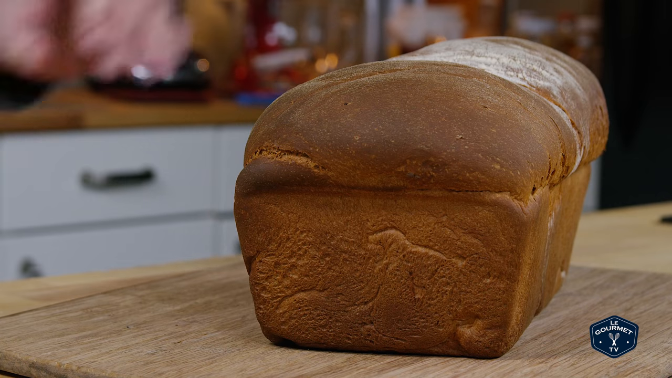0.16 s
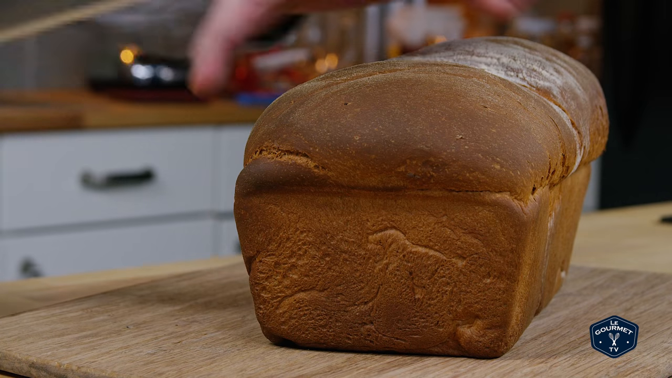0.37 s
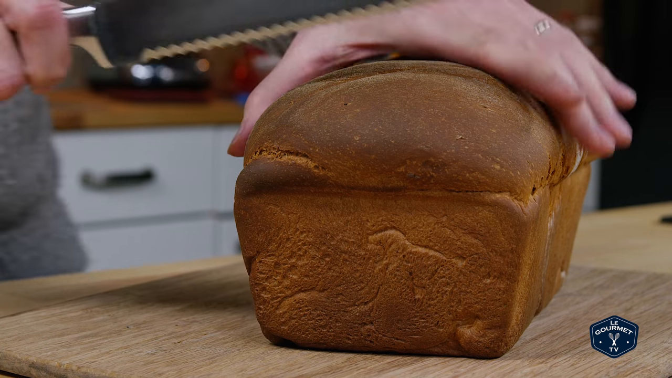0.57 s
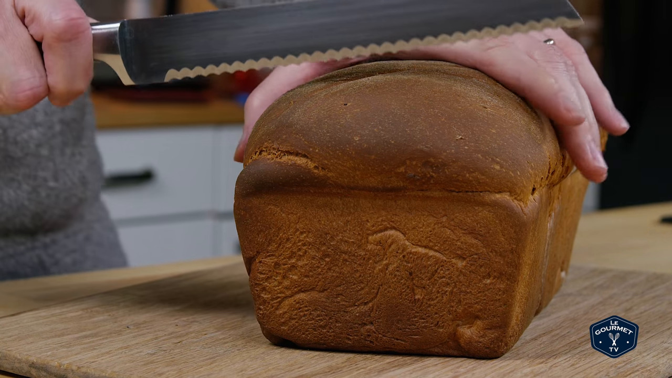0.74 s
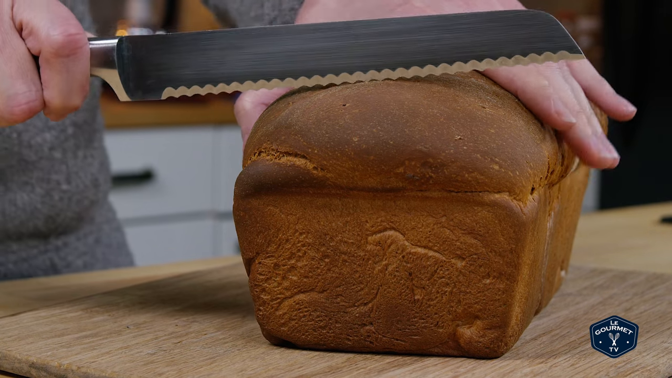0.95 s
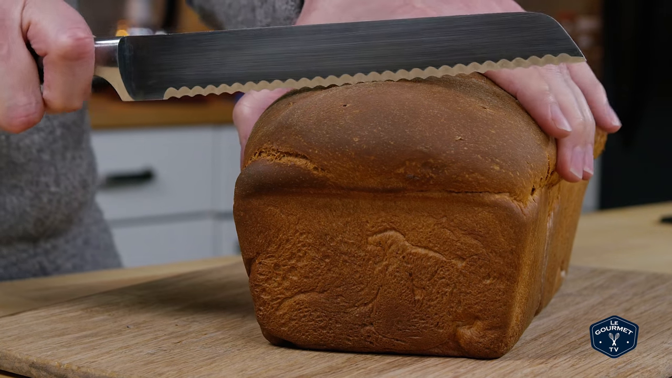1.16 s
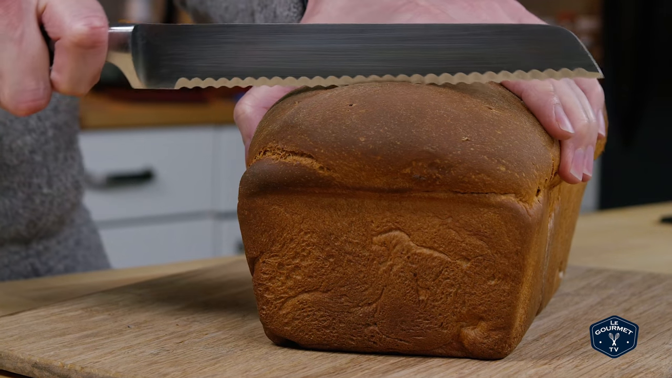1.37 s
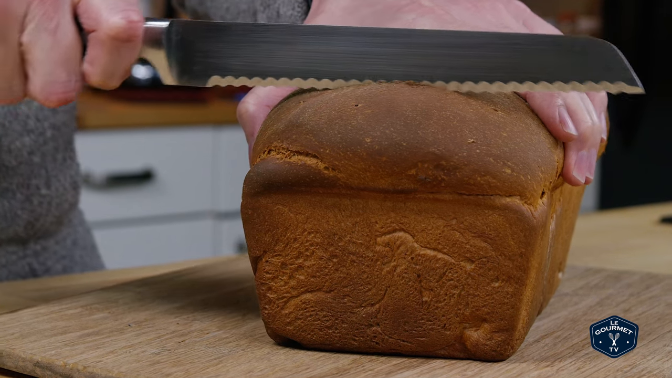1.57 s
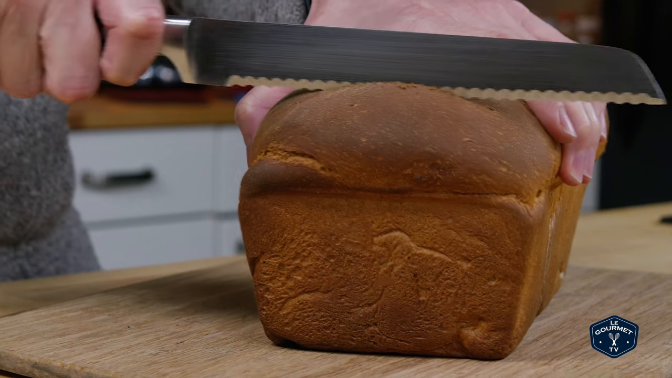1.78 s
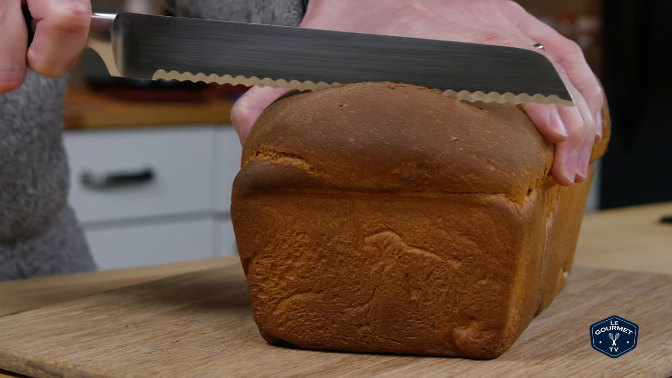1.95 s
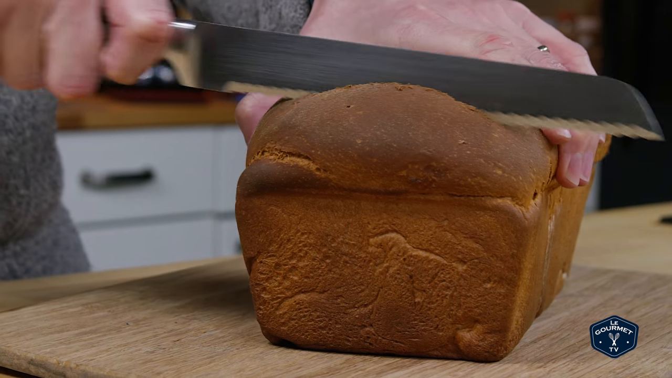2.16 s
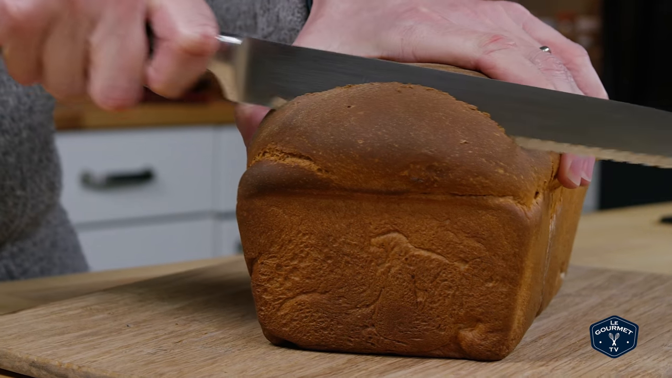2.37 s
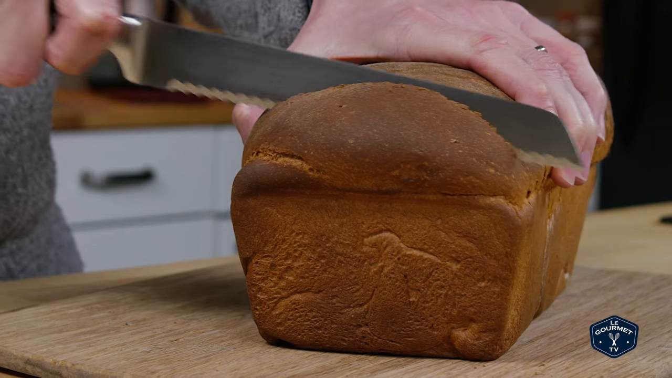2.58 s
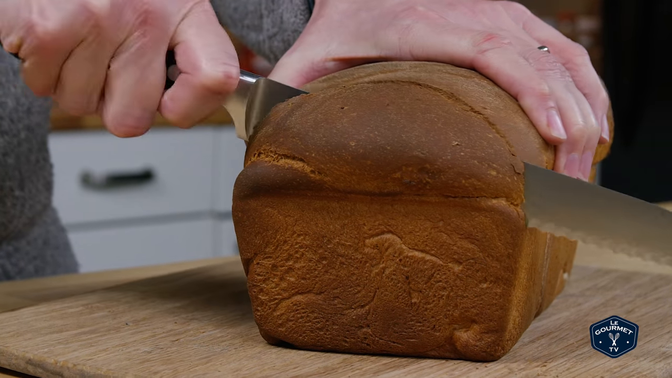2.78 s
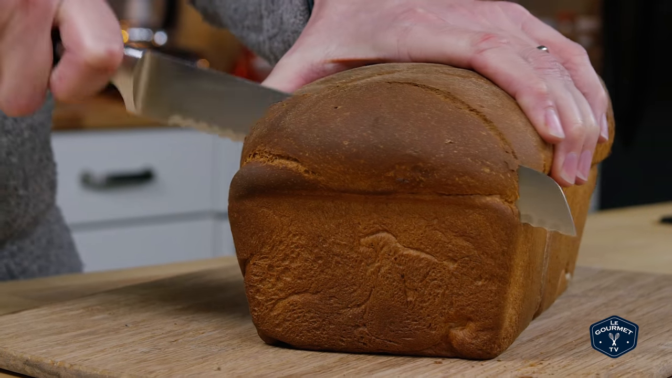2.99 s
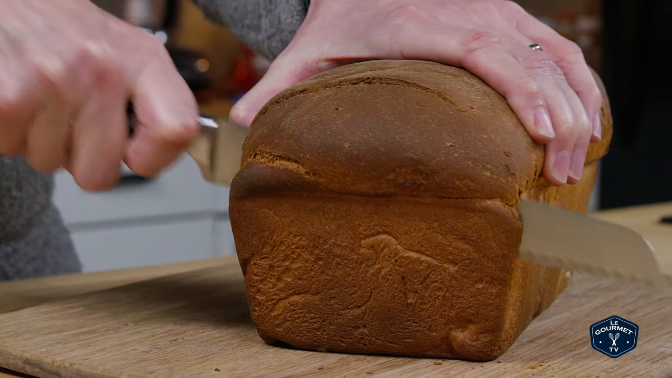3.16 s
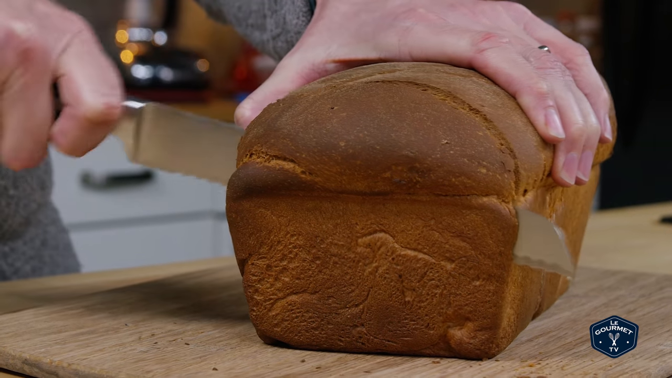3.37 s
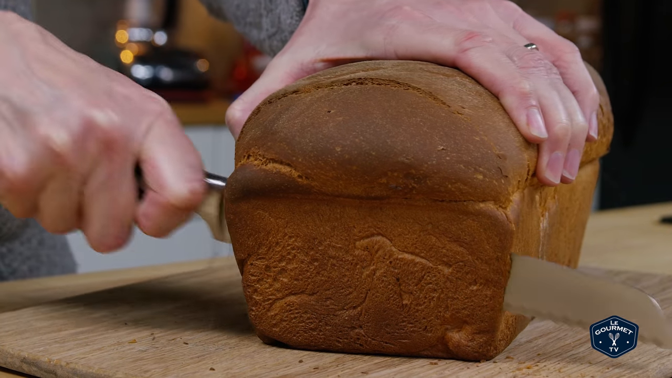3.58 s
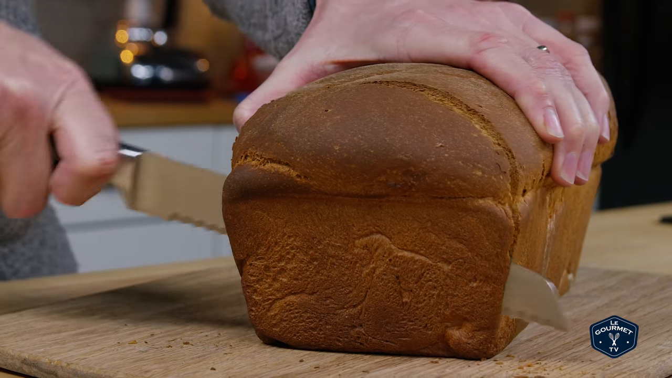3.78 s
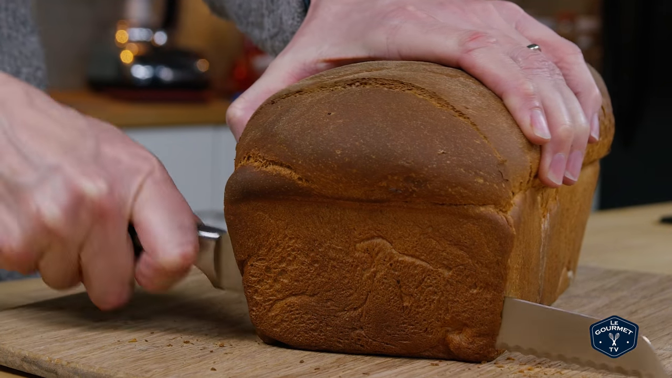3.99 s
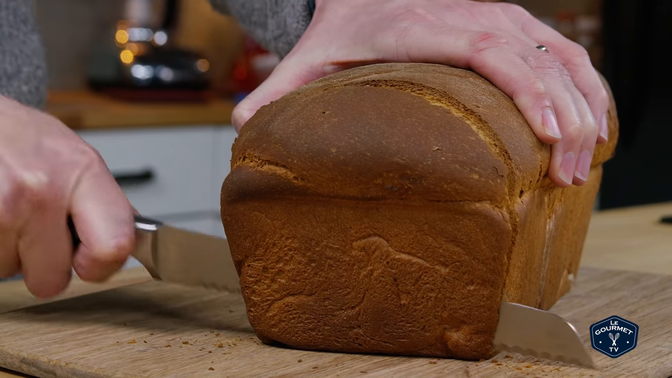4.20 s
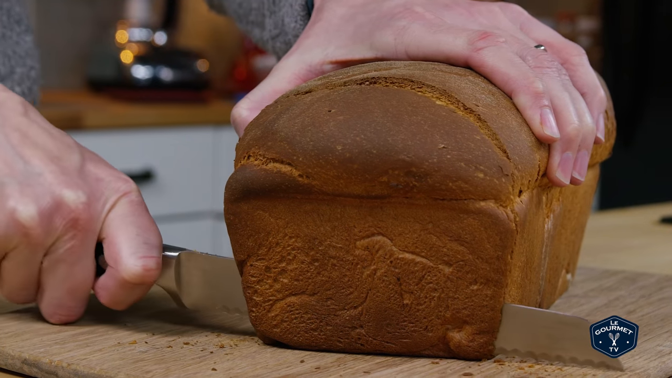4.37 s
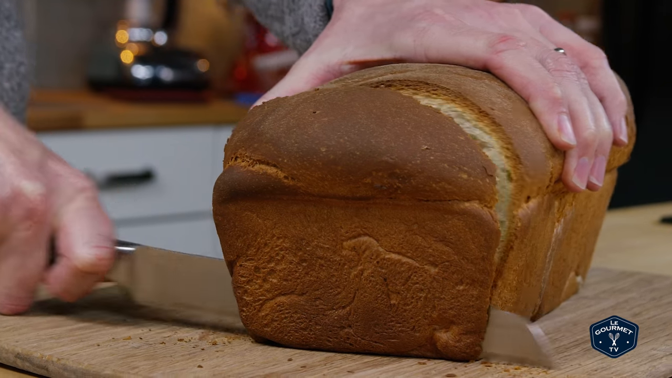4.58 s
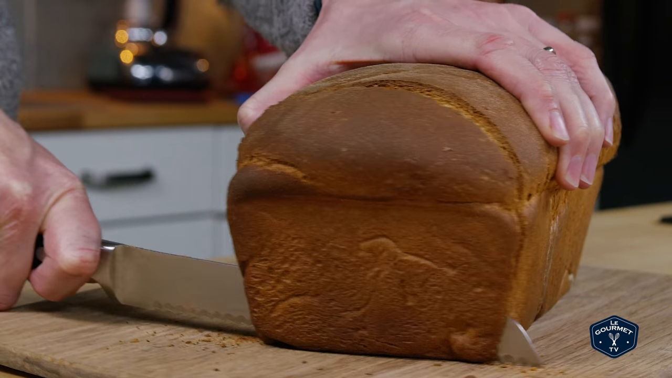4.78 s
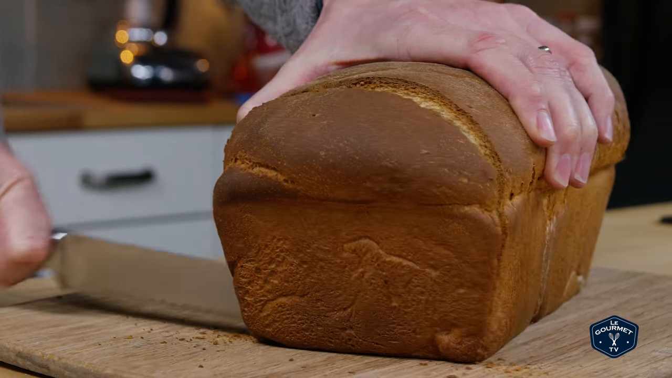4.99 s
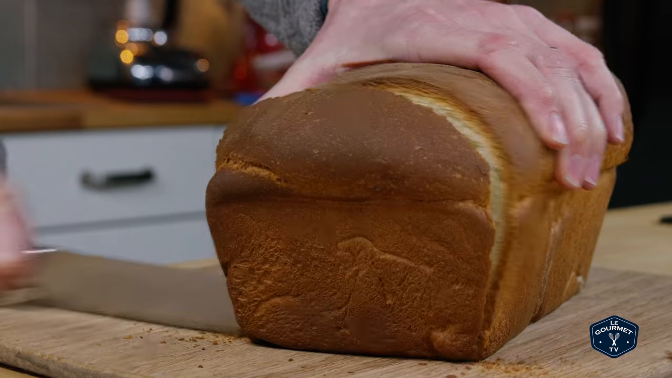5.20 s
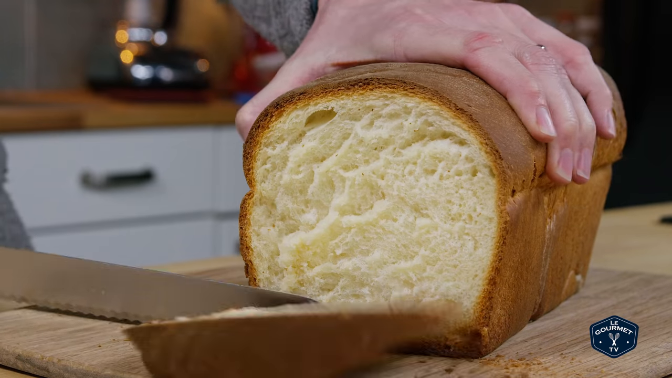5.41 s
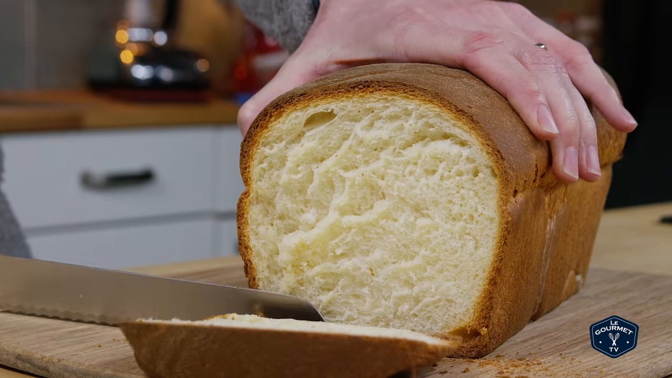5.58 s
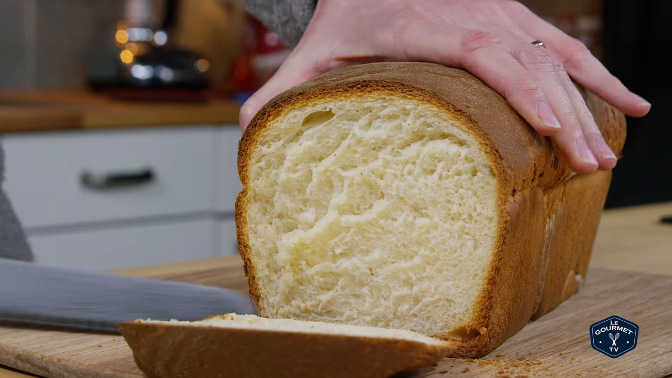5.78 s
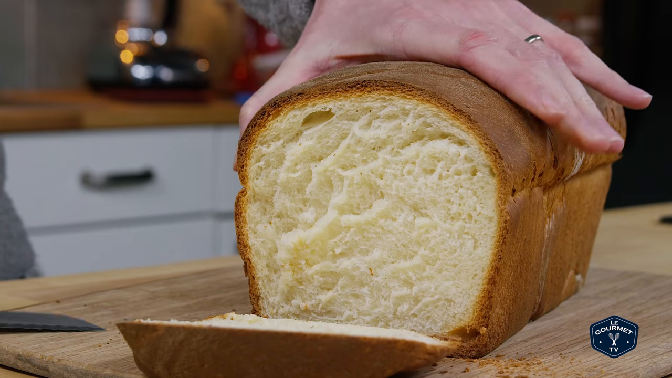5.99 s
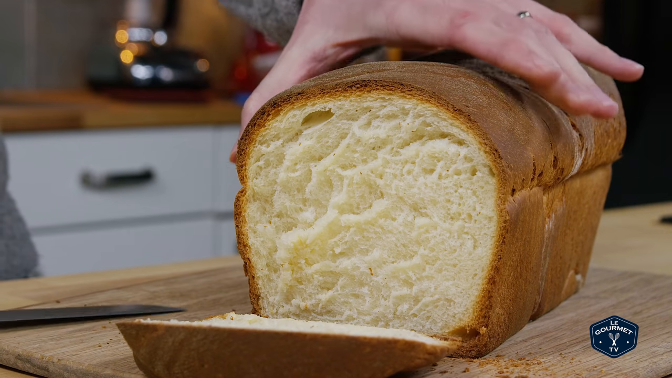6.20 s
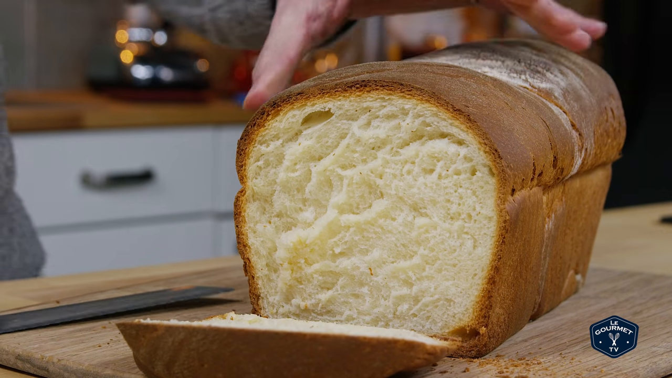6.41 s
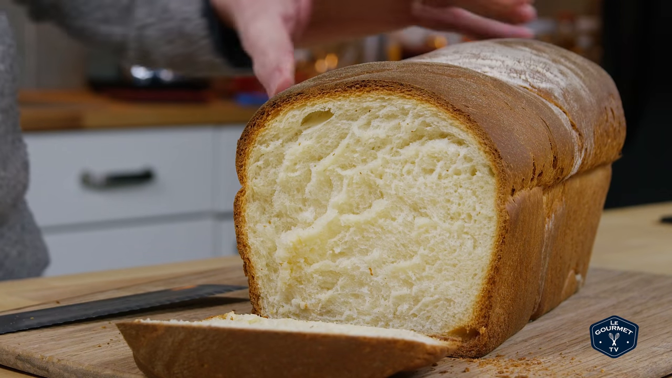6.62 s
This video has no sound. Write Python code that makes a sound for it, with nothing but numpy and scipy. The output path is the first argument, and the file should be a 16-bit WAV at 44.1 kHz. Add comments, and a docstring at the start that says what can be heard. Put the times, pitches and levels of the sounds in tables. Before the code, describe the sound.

Close microphone in a small quiet kitchen. A hand grazes dry crust, then a serrated knife saws a loaf on a wooden board, slow crackling first strokes becoming quicker and fuller, with low board shudder. A strong tearing stroke frees the slice, which falls with clattering woody thumps. The blade drags away with a thin metallic ring and is set down with a sharp knock.

```python
"""A small quiet kitchen, heard close up: a serrated knife saws a crusty loaf on a wooden board.
A hand slides onto the crust, teeth tear it stroke by stroke and shake loaf and board, the slice drops,
the steel blade is dragged off ringing faintly and is laid down with a knock.
Tearing and sliding are shaped noise under movement envelopes; blows excite decaying modes.
A short room tail, air noise and faint appliance tones lie behind."""
import sys
import numpy as np
from scipy import signal
from scipy.fft import rfft, irfft
from scipy.io import wavfile
from scipy.ndimage import uniform_filter1d

SR = 44100
rng = np.random.default_rng(int(sys.argv[2]) if len(sys.argv) > 2 else 0)


def wav_out(sig):
    """Save sig, one row per channel (or a flat mono array), as 16-bit PCM at SR to the path in sys.argv[1]."""
    wavfile.write(sys.argv[1], SR, np.round(np.clip(np.atleast_2d(sig).T, -1, 1) * 32767).astype(np.int16))


N = 293265

# saw strokes: t/s, length/s, fastest point/share of length, rasp level/dB, board drive level/dB
STROKES = [(1.347, 0.5, 0.66, -61.5, -57), (1.862, 0.16, 0.5, -58, -51), (2.059, 0.34, 0.56, -55, -54),
           (2.4, 0.22, 0.79, -60.5, -67), (2.64, 0.2, 0.66, -50.5, -48.5), (2.854, 0.28, 0.35, -71.5, -68),
           (3.08, 0.22, 0.62, -54.5, -44.5), (3.317, 0.27, 0.17, -62.5, -58),
           (3.484, 0.23, 0.55, -52.5, -41), (3.684, 0.29, 0.29, -62, -61.5),
           (3.897, 0.23, 0.39, -50, -43.5), (4.119, 0.23, 0.16, -58, -53), (4.304, 0.13, 0.27, -49, -40),
           (4.443, 0.32, 0.68, -57, -49), (4.756, 0.17, 0.65, -61, -55), (4.94, 0.12, 0.71, -51.5, -46),
           (5.088, 0.14, 0.3, -53, -58.5), (5.224, 0.16, 0.62, -36.5, -37)]
# cut sinking from top crust to board: t/s, crust hiss level/dB re rasp, loaf level/dB re rasp
CUT_DEPTH = [(1.4, -4.5, 1.5), (2.7, 0.5, 3.5), (3.1, -4, 5.5), (3.7, -4.5, 0), (4.1, -9.5, -3.5),
             (4.5, -1, -7), (5.2, -8, -7.5)]
# torn crust, spectral density: f/Hz, level/dB
RASP_TONE = [(900, -13.5), (1320, 5), (1600, 6), (2200, 3), (2800, 2.5), (3700, -2.5), (6000, -13.5)]
# crust hiss, also the tick in knocks(), spectral density: f/Hz, level/dB
HISS_TONE = [(4200, 0.5), (5500, 0), (8600, -6.5), (10500, -9.5), (15700, -12)]
# broad modes of the loaf: f/Hz, relative level/dB
LOAF_MODES = [(300, 12.5), (400, 7), (480, 4), (630, 6.5), (830, 8.5), (1000, -4)]
LOAF_T60_S = 0.015
TEETH_MEAN_HZ = 63.34
HOLD = 1.176  # envelope overshoot, clipped flat: full pressure is reached early and held
PUSH_LAG = 0.14  # hardest push after the fastest point, share of length
REF_STROKE_DB = -55  # stroke level at which hiss has its listed share
HISS_FALL_DB_PER_DB = 0.19  # hiss lost re rasp per dB of stroke over REF_STROKE_DB


def saw():
    """Teeth bite some 60 times a second, unevenly; every bite tears crust and pushes loaf and board."""
    start_s, _, peak, rasp_db, board_db = np.transpose(STROKES)
    cut_s, cut_hiss_db, cut_loaf_db = np.transpose(CUT_DEPTH)
    hiss_db = np.interp(start_s, cut_s, cut_hiss_db) - HISS_FALL_DB_PER_DB * (rasp_db - REF_STROKE_DB)
    loaf_db = np.interp(start_s, cut_s, cut_loaf_db)

    phase = np.cumsum(TEETH_MEAN_HZ * (1 + 0.3 * walk(15)) / SR) % 1
    teeth = 1 + 1.3 * np.exp(-phase / 0.2) * undb(2.5 * walk(45))
    teeth = teeth * undb(2 * walk(70))  # crumbs tear in clumps

    def tearing():
        """Tooth-modulated noise with fresh grains on each call."""
        return unit(teeth * grit(2200, 3, 0.0013)) * rng.standard_normal(N)

    crumb = tearing()
    loaf = high(sum(undb(db) * ring(crumb, hz, LOAF_T60_S) for hz, db in LOAF_MODES), 270)
    crust = mottle(colour(tearing(), RASP_TONE))
    hiss = mottle(colour(tearing(), HISS_TONE))
    layers = (crust, rasp_db), (hiss, rasp_db + hiss_db), (loaf, rasp_db + loaf_db)
    rasp = sum(moves(STROKES, peak, db, 1.19, HOLD) * unit(x) for x, db in layers)

    # the board goes on ringing after each push
    shove = tearing()
    shaking = moves(STROKES, peak + PUSH_LAG, board_db, 1.06) * shove
    return rasp, board(shaking, shaking) / np.std(board(shove, shove))


# crust cracks and teeth catching: t/s, impulse level/dB
CRACKS = [(1.4301, -51.5), (1.4585, -52), (1.505, -41), (1.521, -48), (1.5347, -38.5), (1.5969, -36.5),
          (1.6268, -44), (1.659, -41.5), (1.9, -49), (2.112, -45), (2.4109, -48), (3.114, -52),
          (3.459, -50), (3.504, -44), (4.0564, -36), (4.14, -48), (4.166, -42.5), (4.189, -44),
          (4.348, -40), (4.395, -37.5), (4.5113, -38), (4.6121, -41.5), (4.788, -48), (4.84, -49.5),
          (5.2554, -28.5), (5.27, -33.5)]
DEEP_S = 3.7  # from here cracks come from inside the cut, duller


def cracks():
    """Single snaps of the crust that crumble on for a moment."""
    _, db = np.transpose(CRACKS)
    impulses = blows(CRACKS, db)
    snaps = burst(impulses, 0.0007) + undb(-13) * burst(impulses, 0.005, 0)
    deep = np.arange(N) > DEEP_S * SR
    top_tone = [(700, 10.5), (1500, -0.5), (5000, 4), (9000, -7.0), (15700, -5.5)]
    deep_tone = [(1200, -2.5), (3500, -0.5), (6000, -11.5), (15700, -23)]
    return colour(snaps * ~deep, top_tone) + colour(snaps * deep, deep_tone)


# blows by knife and slice: t/s, wood crack level/dB, edge level/dB re crack, hollow level/dB re crack,
# low board mode drive level/dB, upper board mode drive level/dB
KNOCKS = [(4.017, -23.5, -15, -2.5, -49, -57), (4.028, -29, -4, -4, -47, -53),
          (4.197, -44, 3.5, 9, -47.5, -52), (5.129, -31.5, -5.5, -3.5, -58, -40),
          (5.228, -45, 2, -8, -36, -39), (5.295, -13, -15, -13, -37, -20),
          (5.341, -29, -12, 2.5, -24.5, -39), (5.474, -17, -6, -9, -30.5, -13.5),
          (5.579, -34, -5.5, -1.5, -37, -25), (5.645, -41.5, -7, 2.5, -43.5, -34.5),
          (6.198, -39.5, 0.5, -27, -50.5, -69), (6.427, -35, -2.5, -5.5, -64, -65),
          (6.446, -13, 3.5, 1, -32.5, -31), (6.4663, -24.5, 9, 4, -31.5, -46),
          (6.470, -32, -3, 1, -64, -45)]
# wood crack, spectral density: f/Hz, level/dB
CRACK_TONE = [(800, -1), (1100, 3), (1500, 6), (2300, -1), (3600, -8.5)]
# bright edge of a blow, spectral density: f/Hz, level/dB
EDGE_TONE = [(1800, 0), (3000, 2), (4500, -4.5), (7000, -14)]
# hollow modes of the board: f/Hz, relative level/dB
HOLLOW_MODES = [(362, -16.5), (412, -13.5), (478, -8.5), (625, -11.5), (780, -17.5), (985, -13)]
HOLLOW_T60_S = 0.048
TICK_RE_EDGE_DB = -24


def knocks():
    """A crack of wood that rattles on, a sharper tick, and the board's modes pushed for a few milliseconds."""
    _, crack_db, edge_re_db, hollow_re_db, low_db, upper_db = np.transpose(KNOCKS)
    edge_db = crack_db + edge_re_db
    layers = (crack_db, CRACK_TONE), (edge_db, EDGE_TONE), (edge_db + TICK_RE_EDGE_DB, HISS_TONE)
    crack = sum(colour(rattle(blows(KNOCKS, db)), tone) for db, tone in layers)

    # every blow lands elsewhere and wakes the hollow modes unevenly
    uneven = rng.standard_normal((len(KNOCKS), len(HOLLOW_MODES))).T
    hollow = 0
    for (hz, db), u in zip(HOLLOW_MODES, uneven):
        hollow = hollow + ring(blows(KNOCKS, crack_db + hollow_re_db + db + 3.8 * u), hz, HOLLOW_T60_S)

    push = signal.windows.hann(int(0.004 * SR))
    push = push / push.sum()
    low, upper = (np.convolve(blows(KNOCKS, db), push)[:N] for db in (low_db, upper_db))
    return crack + high(hollow, 380), board(low, upper)


def rattle(x):
    """A short and a longer noise burst after each impulse."""
    return undb(-5.5) * burst(x, 0.0026, 0.13) + undb(-15) * burst(x, 0.0098, 0)


# board modes: f/Hz, relative level/dB, t60/s
BOARD_MODES = [(103.7, -14, 0.32), (131.6, -6.5, 0.35), (175.5, 4, 0.21), (217, -4, 0.16),
               (244, -9.5, 0.15), (265, -15, 0.18)]


def board(low, upper):
    """The board on its worktop radiates little deep bass; low and upper modes have separate drives."""
    modes = sum(undb(db) * ring(low if hz < 200 else upper, hz, t60_s) for hz, db, t60_s in BOARD_MODES)
    return high(modes, 123)


# hand slides on crust: t/s, length/s, nominal fastest point/share of length, skin level/dB
HAND = [(0.357, 0.54, 0.21, -70.5), (0.602, 0.32, 0.61, -48.5), (.93, 0.22, 0.38, -74)]
# skin on crust, spectral density: f/Hz, level/dB
SKIN_TONE = [(410, -43), (700, -10.5), (2750, 0), (4190, -3), (6500, -12), (15500, -40)]
# first light contact, spectral density: f/Hz, level/dB
FINGERTIP_TONE = [(2000, -24), (4800, 2), (7000, -2), (12000, -19)]


def hand():
    """Fingertips graze dry crust, then the palm settles: a gritty hiss that darkens as it swells."""
    _, _, peak, db = np.transpose(HAND)
    palm = moves(HAND, peak + 0.038, db, 2.66) * sliding(SKIN_TONE)
    fingertips = moves(HAND, peak - 0.25, db - 10, 1.1) * sliding(FINGERTIP_TONE)
    return palm + fingertips


def sliding(tone):
    """Dense small ruptures as coloured, mottled noise."""
    return unit(mottle(colour(grit(3600, 1.1, 0.0034) * rng.standard_normal(N), tone)))


# blade dragged over wood: t/s, length/s, fastest point/share of length, scrape level/dB, ring level/dB re scrape
DRAG = [(5.582, 0.2, 0.16, -66.5, -6.5), (5.762, 0.074, 0.49, -71, -8), (5.817, 0.13, 1, -63, 0.5),
        (5.941, 0.13, 0.31, -58, 0.5), (6.191, 0.13, 0.066, -57.5, -15), (6.31, 0.063, 0.93, -65, -27)]
# blade flat on wood, spectral density: f/Hz, level/dB
SCRAPE_TONE = [(900, -1), (1400, 2.5), (2300, 1.5), (4500, -5), (9000, -14.5), (15700, -40)]


def drag():
    """The flat of the blade scrapes the wood; its modes come and go as the contact moves."""
    _, _, peak, db, ring_re_db = np.transpose(DRAG)
    grain = grit(900, 3, 0.0015)
    drives = []
    for hz in BLADE_HZ:
        drive_db = 5.2 * walk(15) - 8.2 * abs(np.log2(hz / 4900))  # fainter away from 4900 Hz
        drives.append(grain * undb(drive_db) * rng.standard_normal(N))
    contact = moves(DRAG, peak, db + ring_re_db, 1.0)
    rings = steel(contact * x for x in drives) / np.std(steel(drives))
    scrape = unit(colour(grain * rng.standard_normal(N), SCRAPE_TONE))
    return moves(DRAG, peak, db, 0.8) * scrape + rings


# free blade touches wood: t/s, tick level/dB, ring drive level/dB, centre of woken modes f/Hz
TOUCHES = [(5.976, -62, -53, 4970), (5.858, -49.5, -69, 5300), (5.867, -54, -59, 5330),
           (5.888, -49, -59, 5330), (5.9195, -43, -52, 4900), (5.93, -62, -59, 8974),
           (5.972, -51, -62, 12100), (5.993, -62, -47, 4720), (6.009, -62, -53, 3890),
           (6.011, -50, -50, 4970), (6.013, -58, -53, 6160), (6.065, -55.5, -70, 7550),
           (6.216, -52, -62, 11600), (6.402, -61, -68, 7550), (6.447, -40, -57, 12950),
           (6.467, -47, -32, 8843)]
# blade tip on wood, spectral density: f/Hz, level/dB
TAP_TONE = [(1400, -2), (2400, 2), (4000, -8.5), (9000, -20)]


def touches():
    """A woody tick, and the steel modes nearest to each touch's centre."""
    _, tick_db, ring_db, centre_hz = np.transpose(TOUCHES)
    uneven = rng.standard_normal((len(TOUCHES), len(BLADE_HZ))).T
    drives = []
    for hz, u in zip(BLADE_HZ, uneven):
        octaves_away = np.abs(np.log2(hz / centre_hz))
        away_db = 32 * np.maximum(octaves_away - 0.02, 0) ** 0.25
        drives.append(blows(TOUCHES, ring_db - away_db + 2 * u))
    return colour(burst(blows(TOUCHES, tick_db), 0.0032), TAP_TONE) + steel(drives)


# steel blade modes: f/Hz
BLADE_HZ = [3890, 4720, 4970, 5330, 6160, 7550, 8974, 10400, 11600, 12100, 12950, 13500, 13800, 15000,
            15700]
BLADE_T60_S = 0.105


def steel(drives):
    """Blade modes, each with its own drive."""
    return sum(ring(x, hz, BLADE_T60_S) for x, hz in zip(drives, BLADE_HZ))


ROOM_T60_S, ROOM_DB = 0.18, -10


def room(near):
    """Decaying noise tail; walls and air swallow some treble."""
    t = np.arange(SR // 3) / SR
    tail = rng.standard_normal(len(t)) * np.exp(-np.log(1000) * t / ROOM_T60_S) * (t > 0.003)
    tail = tail / np.sqrt(np.sum(tail ** 2))
    wet = signal.fftconvolve(near, tail)[:N]
    return undb(ROOM_DB) * colour(wet, [(200, 1.5), (4000, -4), (16000, -9)])


# air noise, spectral density: f/Hz, level/dB
AIR_TONE = [(25, -18), (45, -8), (75, -4.5), (184, -10), (216, -5.5), (261, -11), (299, -14.5), (460, -14),
            (950, -22.5), (2000, -35), (7800, -41.5), (15700, -44)]
# appliance tones: f/Hz, nominal rms level/dB
HUM = [(217, -73), (293, -72.5), (9555, -91.5)]
AIR_RMS_DB = -60


def kitchen():
    """Steady air noise and faint appliance tones that waver in level and phase."""
    t = np.arange(N) / SR
    hum = 0
    for hz, db in HUM:
        level = undb(db + 2 * walk(26)) * np.sqrt(2)
        hum = hum + level * np.sin(2 * np.pi * hz * t + 1.1 * walk(9.7))
    return undb(AIR_RMS_DB) * unit(colour(rng.standard_normal(N), AIR_TONE)) + hum


def moves(table, peak, db, sharp, hold=1):
    """Envelope of movements that speed up from rest, are fastest at share peak of their length and stop."""
    out = np.zeros(N)
    for (start_s, length_s, *_), p, gain in zip(table, peak, undb(db)):
        u = np.arange(int(length_s * SR)) / (length_s * SR)
        warped = np.interp(u, [0, np.clip(p, 0.05, 0.95), 1], [0, 0.5, 1])
        speed = np.minimum(hold * np.sin(np.pi * warped) ** sharp, 1)
        out[int(start_s * SR):][:len(u)] += gain * speed
    return out


def grit(rate_hz, spread_db, tail_s):
    """Envelope of many small ruptures of uneven but bounded size, decaying with time constant tail_s."""
    size_db = spread_db * np.minimum(rng.exponential(size=N), 3.5)
    size = (rng.random(N) < rate_hz / SR) * undb(size_db)
    return unit(signal.lfilter([1], [1, -np.exp(-1 / (tail_s * SR))], size))


def mottle(x):
    """Patches of the spectrum wax and wane a little as other bits of crust resonate."""
    edges_hz = 900 * 2 ** np.arange(0, 4.2, 1 / 3)
    bands = (signal.lfilter(*signal.butter(1, [lo, hi], "band", fs=SR), x)
             for lo, hi in zip(edges_hz, edges_hz[1:]))
    return x + sum(0.45 * walk(25) * band for band in bands)


def walk(rate_hz):
    """Random levels held 1 / rate_hz s and slewed."""
    k = int(SR / rate_hz)
    return uniform_filter1d(np.repeat(rng.standard_normal(N // k + 1), k), k)[:N]


def blows(table, db):
    """An impulse at each row's time."""
    x = np.zeros(N)
    x[(np.array(table)[:, 0] * SR).astype(int)] = undb(db)
    return x


def burst(x, tail_s, snap=0.45):
    """A snap at each impulse, then noise that dies away."""
    tail = signal.lfilter([1], [1, -np.exp(-1 / (tail_s * SR))], x)
    return snap * x + tail * rng.standard_normal(N)


def ring(x, hz, t60_s):
    """One decaying mode; a unit impulse rings with peak near 1."""
    pole = np.exp(2j * np.pi * hz / SR - np.log(1000) / (t60_s * SR))
    return signal.lfilter([1], [1, -pole], x).imag


def colour(x, points):
    """Causal unit-energy filter shaped by (f/Hz, level/dB) points, from the cepstrum."""
    hz, db = np.transpose(points)
    f = np.maximum(np.fft.rfftfreq(8192, 1 / SR), 1)
    octaves_beyond = np.maximum(np.log2(hz[0] / f), 0) + np.maximum(np.log2(f / hz[-1]), 0)
    gain_db = np.interp(np.log(f), np.log(hz), db) - 24 * octaves_beyond
    c = irfft(np.log(undb(np.maximum(gain_db, -120))))
    c[1:4096] *= 2  # fold to minimum phase
    c[4097:] = 0
    h = irfft(np.exp(rfft(c)))[:4096]
    return signal.fftconvolve(x, h / np.sqrt(np.sum(h ** 2)))[:len(x)]


def high(x, hz):
    """Third-order high-pass."""
    return signal.sosfilt(signal.butter(3, hz, "high", fs=SR, output="sos"), x)


def undb(db):
    """dB to amplitude."""
    return 10 ** (np.asarray(db) / 20)


def unit(x):
    """Scale to rms 1."""
    return x / np.sqrt(np.mean(x ** 2))


def scene():
    """Near sounds and their room tail, board modes and kitchen background, summed to one channel."""
    rasp, shaken = saw()
    hits, struck = knocks()
    near = hand() + rasp + drag() + cracks() + touches() + hits
    return (near + room(near) + shaken + struck + kitchen())[None]


TOP_HZ = 15800


def record(dry):
    """Steep low-pass: the recorder cuts the top."""
    return signal.sosfilt(signal.ellip(10, 0.2, 70, TOP_HZ, fs=SR, output="sos"), dry)


dry = scene()
out = record(dry)
wav_out(out)
```